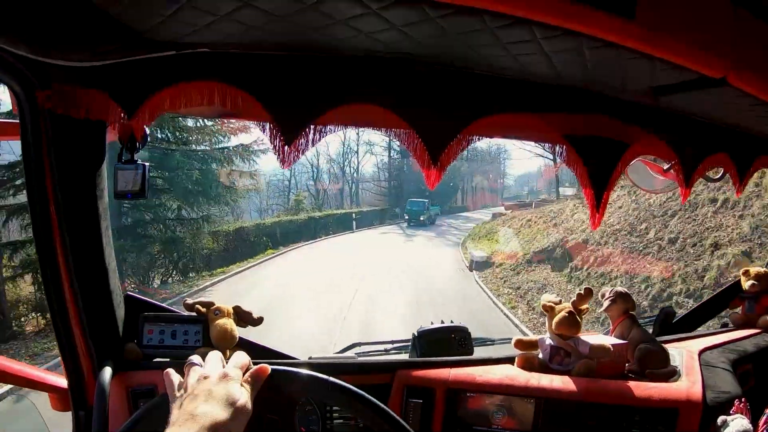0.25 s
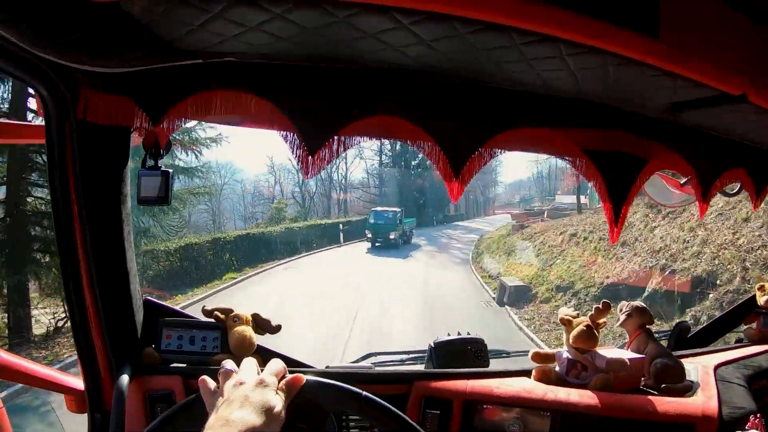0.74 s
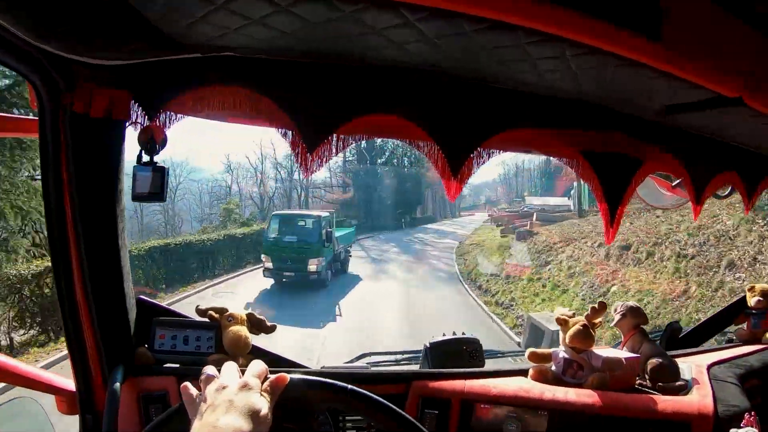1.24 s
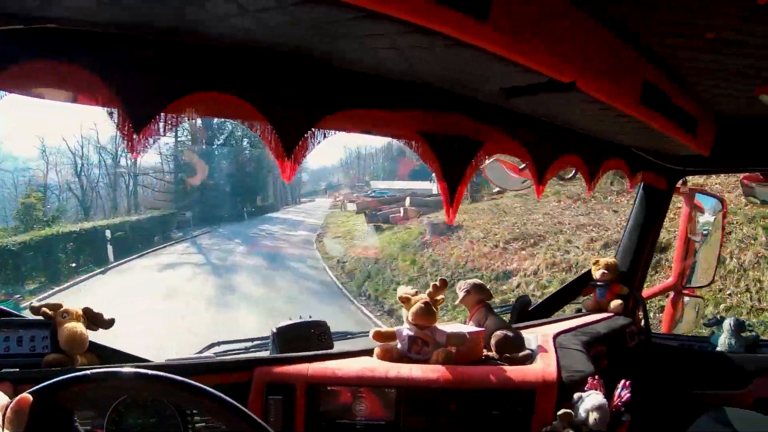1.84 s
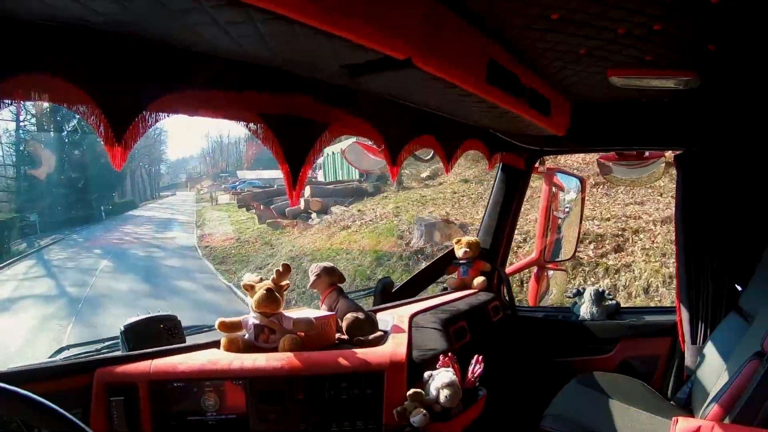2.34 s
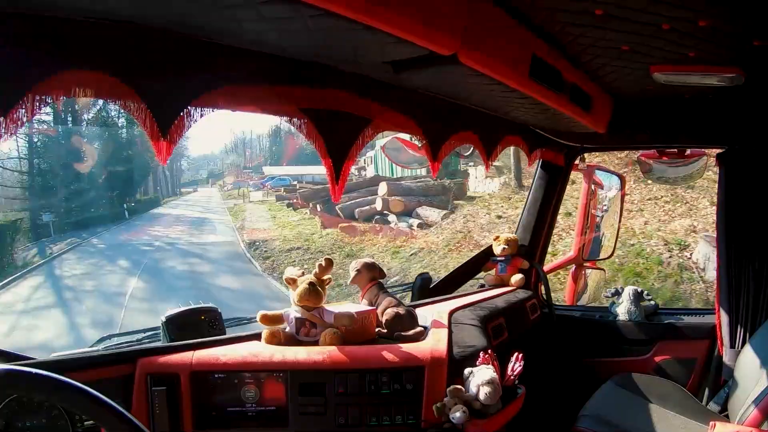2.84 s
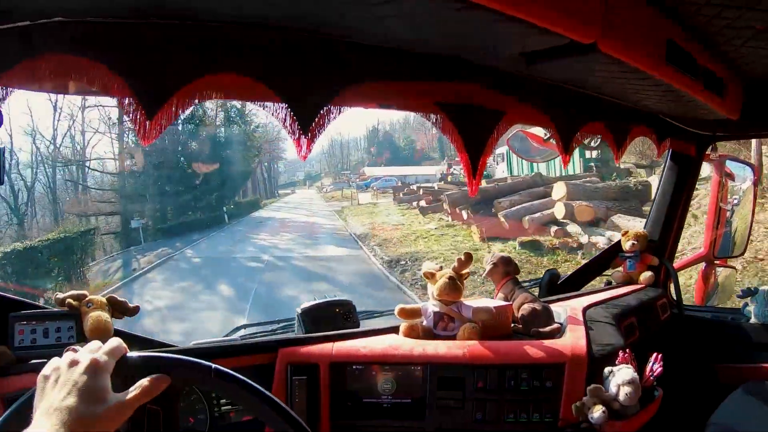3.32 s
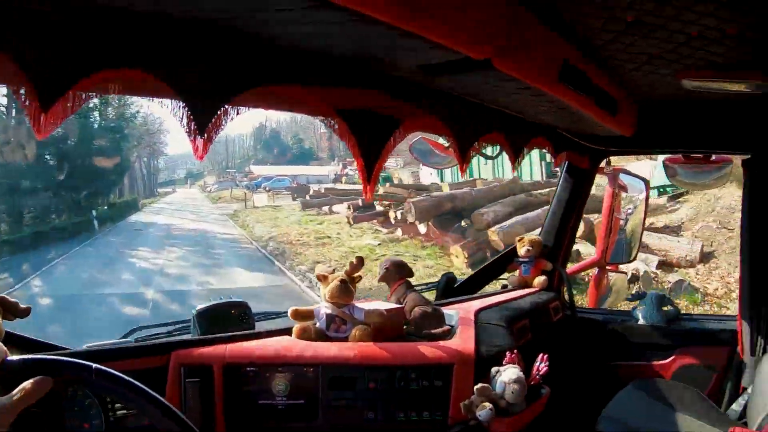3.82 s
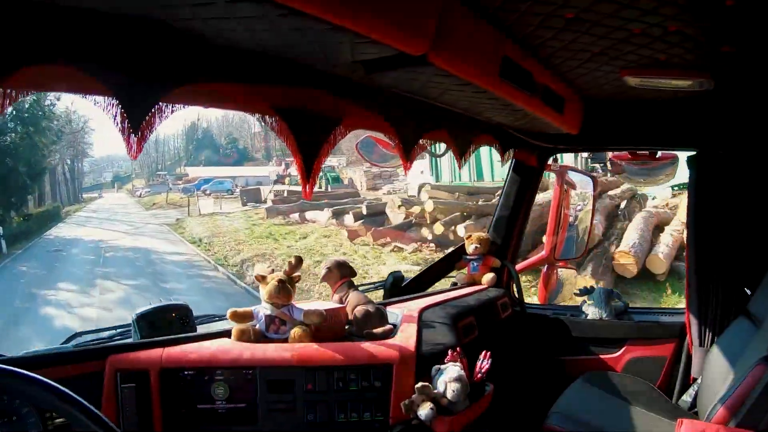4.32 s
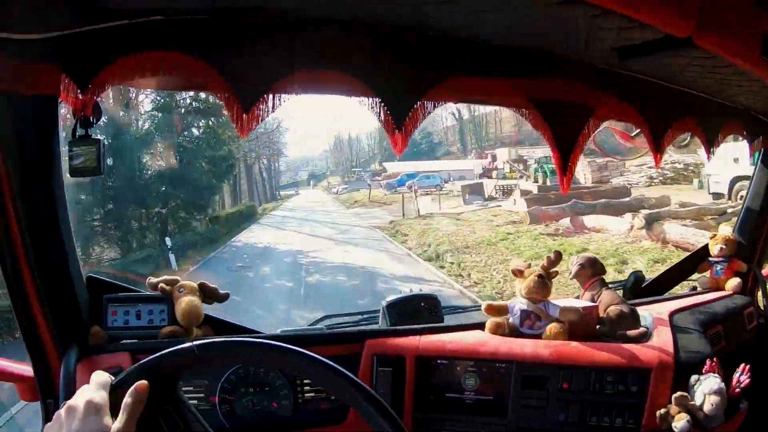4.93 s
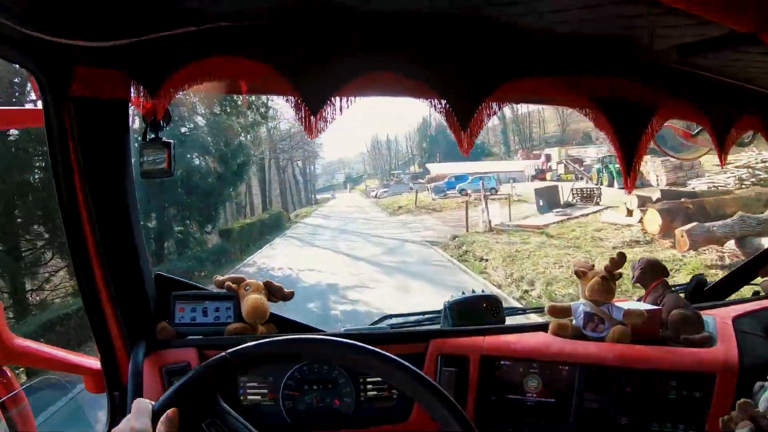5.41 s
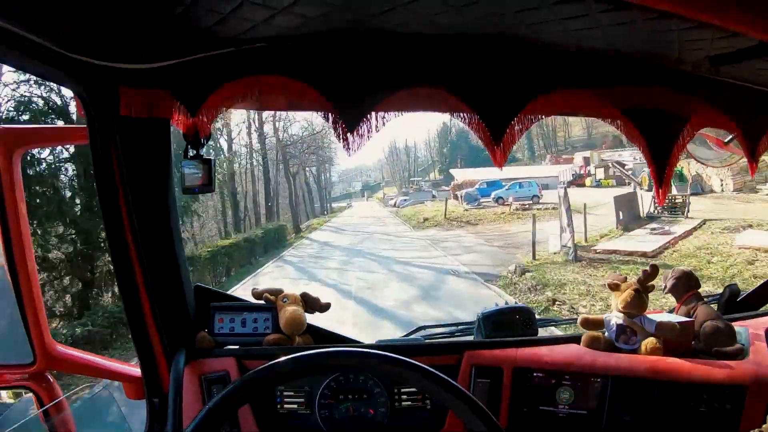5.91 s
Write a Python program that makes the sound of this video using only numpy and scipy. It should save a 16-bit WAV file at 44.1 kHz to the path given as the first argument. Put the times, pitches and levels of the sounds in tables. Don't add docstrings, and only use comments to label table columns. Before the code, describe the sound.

From the start a heavy diesel drones close and boomy inside a truck cab, its low pulsing tone sinking gradually until about 1.8 seconds. Block clatter, fine injector rattle, hiss and a faint fan hum surround it; dash panels buzz unevenly, and thin rubber squeaks come early and around 1.2 to 1.7 seconds. From about 1.6 an oncoming lorry swells quickly, whooshes by at 1.95 with a puff of air, and fades by 2.5, leaving a brief reflected rattle. The engine drops clearly softer around 2.4 to 2.7, then regains force by 3.3 and climbs steadily in pitch to the end at about 6.2. Tyre rumble and soft low bumps continue, strongest near 5.1, with tiny dry trim ticks from 3.2 onward. From 4.8 the knock hardens slightly and a very faint turbo whistle glides upward, levelling near 5.9. The microphone is small, stereo and slightly compressed.

```python
import sys
import numpy as np
from scipy import signal
from scipy.io import wavfile
from scipy.ndimage import uniform_filter1d

SR = 44100
rng = np.random.default_rng(int(sys.argv[2]) if len(sys.argv) > 2 else 0)


def makeup_ratio(level_db):
    decades = np.asarray(level_db, float) / 20
    return 10 ** decades


def waveform_to_disk(signal):
    frames = np.transpose(np.atleast_2d(signal))
    scaled = np.clip(frames, -1, 1) * 32767
    samples = np.round(scaled).astype(np.int16)
    wavfile.write(sys.argv[1], SR, samples)


N = 271656
T = np.arange(N) / SR

# time_s, half_firing_rate_hz, force_db
ENGINE_RUN = [(0.0, 30.63, 2), (0.2, 29.9, 0.5), (0.5, 29.11, 3), (0.75, 28.47, 4), (1.25, 26.68, 3.5),
              (1.75, 26.37, 3), (1.92, 26.9, 1), (2.4, 26.91, -11), (2.7, 27.34, -9.5), (3.25, 28.4, 0.5),
              (3.6, 28.66, 1.5), (4.0, 29.84, 2), (4.6, 31.9, 1), (4.9, 33.07, 1.5), (5.2, 34.36, 0.5),
              (5.5, 35.86, 2.5), (5.8, 37.21, 3), (6.16, 37.7, 0.5)]
# time_s, pull_share
PULL_SHARE = [
    (0, 0.13),
    (1.8, 0.048),
    (1.96, 0.91),
    (6.16, 0.92),
]
ENGINE_ORDERS = [2, 3, 5, 6, 7, 8, *range(9, 31), 32, 33, 34, 36, 38, 39, 40, 42, 43, 44, 45, 46]
# labour_slow_db, labour_fast_db, pull_slow_db, pull_fast_db
ORDER_LEVELS = [(-45, -35.5, -35, -34.5), (-45, -54, -35.5, -47), (-43, -56, -46.5, -39.5),
                (-31.5, -28.5, -38, -30), (-52.5, -33.5, -34.5, -47.5), (-37, -54, -44, -34.5),
                (-29, -39.5, -37.5, -34), (-63.5, -59, -37.5, -36.5), (-50.5, -50, -45.5, -38),
                (-42.5, -30, -30, -33.5), (-46, -27, -44.5, -43.5), (-58, -42, -44.5, -40.5),
                (-24.5, -27, -35, -47), (-42, -46.5, -53, -43), (-38.5, -39, -46, -52),
                (-38, -52, -48, -51), (-49, -39.5, -56.5, -56.5), (-47, -55, -52, -45.5),
                (-35.5, -36, -40, -47.5), (-65.5, -48.5, -51.5, -59.5), (-45, -55.5, -56, -62.5),
                (-45, -57, -61, -42), (-52, -56.5, -60, -48), (-56, -43.5, -53.5, -45),
                (-49, -34.5, -42.5, -54.5), (-55.5, -42.5, -43, -48), (-64, -58, -55.5, -56),
                (-46.5, -68, -48.5, -56.5), (-58.5, -71.5, -52.5, -57.5), (-64, -61, -62, -68),
                (-64, -47, -58, -52.5), (-58, -47, -66.5, -63.5), (-56, -45, -61.5, -56.5),
                (-60.5, -51.5, -54, -61.5), (-50.5, -47.5, -63, -63), (-54, -61, -64, -55),
                (-55.5, -55.5, -67, -59.5), (-54, -63.5, -67, -62), (-60, -61, -62, -59),
                (-61.5, -62.5, -68, -62)]
# pitch_hz, gain_db
CAB_RESPONSE = [(45, 2), (78, 0), (92, -8.5), (111, -0.5), (120, -2.5), (132, -0.5), (142, 3.5), (157, 8),
                (168, 5), (184, -6.5), (212, 1), (235, -1.5), (257, 6), (274, -5.5), (297, 4), (325, 1),
                (375, 4.5), (430, -4), (480, 5)]
# pitch_hz, width_hz, boost_db
SUMP_RINGING = [(468, 53, 6), (574, 42, 4.5), (651, 39, 11), (827, 76, 6), (930, 59, 4.5)]
# pitch_hz, level_db
CLATTER_COLOUR = [(180, -28), (300, -1.5), (391, -12), (646, -4.5), (901, -9.5), (973, -6.5), (1110, -6),
                  (1280, -8.5), (1970, -13.5), (2300, -18.5), (2990, -31), (5060, -120)]
# pitch_hz, width_hz, boost_db
BLOCK_RINGING = [(593, 120, 2.5), (862, 99, 4), (955, 31, 3.5), (1264, 145, 4.5), (1600, 130, 4),
                 (1768, 90, 1), (1987, 57, 3)]
# middle_s,
# half_length_s, level_db, pitch_hz
PANEL_BUZZES = [(0.053, 0.059, -38, 940), (0.32, 0.33, -40.5, 962), (1.23, 0.66, -45, 955),
                (0.563, 0.034, -36, 965), (.555, 0.025, -46, 1300), (0.655, 0.032, -38, 955),
                (1.05, 0.16, -42.5, 970), (1.4, 0.0099, -36, 965), (1.1, 0.012, -45, 960),
                (1.7, .015, -37, 860), (1.77, 0.039, -40, 955), (1.8, .05, -41, 1310),
                (1.925, 0.041, -36.5, 1570), (2.09, 0.02, -33.5, 1000), (3.44, 0.24, -46, 575),
                (4, 0.074, -42, 880), (5.75, 0.21, -38, 840), (2.65, .2, -49.5, 1630),
                (4.28, .25, -46, 1640), (5.6, 0.22, -48.5, 2200), (3.203, 0.23, -44, 1285),
                (0.48, .2, -46.5, 1400), (3.73, 0.35, -39.5, 959.2), (4.88, 0.21, -46.5, 1800),
                (5.147, 0.23, -39, 955), (5.57, 0.31, -37, 960), (5.63, 0.27, -43.5, 1950),
                (2.24, .12, -42, 1310), (1.96, .03, -38, 1930), (1.85, .05, -40, 1490),
                (1.94, .09, -41, 700), (1.42, 0.13, -44.5, 1110), (5.9, 0.23, -44.5, 1900),
                (4.85, .15, -43.5, 650), (2.25, .06, -41.5, 1010)]
# pitch_hz, level_db
WHOOSH_COLOUR = [(150, -37), (290, -1.5), (450, -21), (692, -7), (1150, -8.5), (1550, -3.5), (1930, -8.5),
                 (3170, -14), (4780, -21), (7930, -16), (10200, -27.5), (11000, -42.5), (13000, -43),
                 (15000, -51.5), (17000, -98)]
# pitch_hz, level_db
RATTLE_COLOUR = [(1500, -25), (2100, -3), (2450, -3), (2850, 0), (3200, -3), (3500, -8), (3900, -9),
                 (4300, -10), (4600, -14.5), (5000, -16), (6000, -30), (10200, -33), (11200, -60)]
# pitch_hz, level_db
HISS_COLOUR = [(3000, -25), (4500, -3), (5600, 0), (7000, -2), (8800, -3), (10200, -11), (10900, -21),
               (13000, -27), (14500, -36), (15300, -55), (17000, -80)]
# time_s, level_db
FAN_LEVEL = [
    (0, -28.5),
    (1, -46),
    (3, -29.5),
    (3.6, -28.5),
    (4.2, -64),
]
# time_s, level_db
PUMP_LEVEL = [(0, -47.5), (.5, -49), (.9, -56), (1.35, -43.5), (1.7, -52.5), (2.2, -47), (2.7, -46.5),
              (3.2, -47), (3.8, -56), (4.3, -44), (5, -57), (6.16, -51)]
# middle_s, half_length_s, level_db, pitch_hz
MOUNT_SQUEAKS = [
    (0.095, 0.096, -62.5, 4670),
    (.35, .2, -67.5, 4570),
    (.47, 0.038, -73, 4670),
    (1.24, 0.048, -59.5, 4060),
    (1.322, 0.046, -57.5, 4065),
    (1.463, .08, -60, 3970),
    (1.7, .05, -61, 3860),
]
# pitch_hz, level_db
THUMP_COLOUR = [(6, -3), (14, 0), (24, 14.5), (31, -2), (39, 7.5), (48, 4.5), (70, -49), (200, -120)]
# pitch_hz, level_db
ROAD_COLOUR = [(24, -33), (40, -9.5), (92, 3), (145, 1.5), (165, -0.5), (208, -8.5), (280, -12.5),
               (415, -24), (450, -36.5), (580, -55), (990, -120)]
# middle_s, level_db
ROAD_BUMPS = [(.06, -23.5), (0.4, -28.5), (1.0, -46), (1.95, -37), (2.37, -27), (3.1, -28.5), (3.501, -35),
              (4.2, -39), (4.6, -26), (4.87, -26), (5.13, -19), (5.8, -22)]
# start_s, level_db, pitch_hz, length_s
TRIM_TICKS = [(3.191, -46, 7000, 0.007), (3.643, -36.5, 4100, 0.014), (3.64, -43, 6200, 0.012),
              (4.322, -36, 8524, 0.003), (4.431, -37, 6070, 0.01), (5.35, -41, 6500, .008),
              (5.428, -39, 6976, 0.006), (5.818, -36, 6995, 0.0026), (3.258, -42, 5000, .005),
              (4.287, -46, 6004, 0.0051), (5.284, -44, 6010, .005), (6.133, -43, 5890, 0.0096)]
# pitch_hz, likeness
PORT_LIKENESS = [(60, 1), (150, .99), (260, .97), (540, .84), (1100, .62), (2300, .68), (4800, .5),
                 (10000, .4), (12000, .45)]
# pitch_hz, lead_rad
PORT_LEAD = [(350, 0), (690, -.3), (950, 1.0), (1550, .9), (2240, -.6), (2670, -1.1), (3700, .25),
             (4480, -.4), (5400, -1.8), (8270, -2.8), (10300, -2.6), (12000, -1.6)]
# pitch_hz, left_minus_right_db
PORT_LEAN = [(330, -.5), (590, -4), (1040, -7), (1830, -5), (3240, -3), (5730, -1), (10100, -2),
             (12000, -.5)]

SLOWEST_HZ = 27
LABOUR_SPAN_HZ, PULL_SPAN_HZ = 4, 11
# labouring_db, pulling_db, extra_db per Hz of speed when pulling, extra_db per dB of force
CLATTER_LAW, RATTLE_LAW = (-40, -37, 0.356, 0.17), (-49.5, -47.5, 0.5556, 0.02)
HISS_LAW = (-58, -59, 1.0345, 0.03)
JOLT_LAW, RUMBLE_LAW = (-42, -29.5, 0.43, 0.3), (-35, -34.5, 0.33, 0.2)
PULSE_TURNS = 1 / 3
KNOCK_DB, KNOCK_PULL_DB, KNOCK_ODD_DB = -65, 4.5, -5.5
BUMP_S = 0.052
PASS_S, PASS_DB, NEARING_DB_PER_S, LEAVING_DB_PER_S = 1.949, -43, 37, 36
GUST_DB, GUST_S = -50.5, 0.046
TYRES_AHEAD_S, TYRES_DB = 0.16, -57
ECHO_AFTER_S, ECHO_DB, ECHO_S = 0.23, -53.5, 0.33
SPOOL_S, SPOOL_HZ, SPOOL_HZ_PER_S = 4.8, 5400, 2390
BOOST_HZ = 8000
TURBO_DB, TURBO_DB_PER_S, TURBO_RISE_S = -69.5, 3, .12
BOOST_DB, BOOST_S = 1, 0.13


def evened(x):
    return x / np.sqrt(np.mean(x ** 2) + 1e-20)


def read(points, hz):
    f, value = np.transpose(points)
    return np.interp(np.log(hz + 1), np.log(f + 1), value)


def curve(rows, column, t=T):
    rows = np.array(rows)
    return np.interp(t, rows[:, 0], rows[:, column])


def humps(modes, hz):
    return sum(db / (1 + (2 * (hz - f) / width) ** 2) for f, width, db in modes)


def drift(rate_hz, t=T):
    rates = np.geomspace(rate_hz / 12, rate_hz, num=8)
    return evened(sum(np.sin(2 * np.pi * (f * t + rng.random())) / np.sqrt(f) for f in rates))


def swell(at_s, db, width_s):
    return makeup_ratio(db) * np.exp(-((T - at_s) / width_s) ** 2)


def follow(labour_db, pull_db, per_hz, per_force):
    faster = curve(ENGINE_RUN, 1) - SLOWEST_HZ
    pulling_db = curve(PULL_SHARE, 1) * (pull_db - labour_db + per_hz * faster)
    return makeup_ratio(labour_db + pulling_db + per_force * curve(ENGINE_RUN, 2))


def noise(shape_db, size, patchy_db, repeating=0):
    overlap = 3 * size // 4
    source = rng.standard_normal((2, N)) + repeating
    hz, t, (left, other) = signal.stft(source, SR, nperseg=size, noverlap=overlap)
    patches = rng.standard_normal((len(t), len(hz))).T
    patches = uniform_filter1d(patches, size=8, axis=0)
    patches = evened(uniform_filter1d(patches, size=10, axis=1))
    same = np.clip(read(PORT_LIKENESS, hz), -1, 1)[:, None]
    shifted = left * np.exp(-1j * read(PORT_LEAD, hz))[:, None]
    right = same * shifted + np.sqrt(1 - same ** 2) * other
    lean = makeup_ratio(read(PORT_LEAN, hz) / 2)[:, None]
    z = np.array([left * lean, right / lean]) * makeup_ratio(shape_db(hz)[:, None] + patchy_db * patches)
    return evened(signal.istft(z, nperseg=size, noverlap=overlap)[1][:, :N])


def whistle(turns, level_db, fuzz_db, waver):
    t = T[::32]
    fuzz = np.interp(T, t, drift(60, t))
    slip = np.interp(T, t, drift(150, t))
    return makeup_ratio(level_db + fuzz_db * fuzz) * np.sqrt(2) * np.sin(2 * np.pi * turns + waver * slip)


def crank():
    return np.cumsum(curve(ENGINE_RUN, 1) / 3 * (1 + .002 * drift(6))) / SR


def engine(cycles, wander_db=1.2, scatter=.15):
    t = T[::512]
    half_hz, pull = curve(ENGINE_RUN, 1, t), curve(PULL_SHARE, 1, t)
    out = np.zeros(N)
    spans = np.array([[LABOUR_SPAN_HZ], [PULL_SPAN_HZ]])
    labour_fast, pull_fast = np.clip((half_hz - 26.5) / spans, 0, 1)
    for k, dbs in zip(ENGINE_ORDERS, ORDER_LEVELS):
        labour_db = dbs[0] + labour_fast * (dbs[1] - dbs[0])
        pull_db = dbs[2] + pull_fast * (dbs[3] - dbs[2])
        db = labour_db + pull * (pull_db - labour_db) + read(CAB_RESPONSE, k * half_hz / 3)
        size = makeup_ratio(db + curve(ENGINE_RUN, 2, t) + wander_db * drift(4.4, t))
        stray = rng.random()
        start = 2 * np.pi * (stray if k % 3 else PULSE_TURNS)
        slip = start + scatter * drift(2.9, t)
        out += np.interp(T, t, size) * np.cos(2 * np.pi * k * cycles + np.interp(T, t, slip))
    late = np.pad(out, (4, 0), "edge")[:N]
    return np.sqrt(2) * np.array([late, out]) * makeup_ratio([[-.25], [.25]])


def sump_knock(cycles):
    t, out = T[::256], np.zeros(N)
    for k in range(48, 100, 3):
        db = KNOCK_DB + KNOCK_PULL_DB * curve(PULL_SHARE, 1, t) + KNOCK_ODD_DB * (k % 2)
        db = db + humps(SUMP_RINGING, k * curve(ENGINE_RUN, 1, t) / 3)
        db = db + 1.2 * curve(ENGINE_RUN, 2, t) + 2.25 * drift(8.7, t)
        slip = 2 * np.pi * rng.random() + 0.58 * drift(9, t)
        out += np.interp(T, t, makeup_ratio(db)) * np.cos(2 * np.pi * k * cycles + np.interp(T, t, slip))
    return np.sqrt(2) * out * [[.72], [1.28]]


def clatter(cycles, knock=0.029, regular=0.79):
    angle = np.arange(4097) / 4096
    rows = rng.standard_normal((2, 4097))
    pattern = np.array([np.interp(cycles % 1, angle, row) for row in rows])
    ring = noise(lambda hz: read(CLATTER_COLOUR, hz) + humps(BLOCK_RINGING, hz), size=4096,
                 patchy_db=1.56, repeating=regular * pattern)
    firing = np.cos(2 * np.pi * 6 * cycles)
    boost = makeup_ratio(BOOST_DB * np.clip((T - SPOOL_S) / BOOST_S, 0, 1))
    return ring * (1 + knock * firing) * follow(*CLATTER_LAW) * boost * makeup_ratio(4.0)


def panels():
    hum = sum(swell(s, db, half_s) * whistle(hz * T, 0, fuzz_db=1.0, waver=0.76)
              for s, half_s, db, hz in PANEL_BUZZES)
    return hum * [[.65], [1.35]]


def lorry():
    fade = np.interp(T, [1.15, 1.6, 2.3, 2.7], [0, 1, 1, 0])
    away_db = np.maximum(NEARING_DB_PER_S * (PASS_S - T), LEAVING_DB_PER_S * (T - PASS_S))
    size = makeup_ratio(PASS_DB - away_db) + swell(PASS_S - .02, GUST_DB, GUST_S)
    whoosh = noise(lambda hz: read(WHOOSH_COLOUR, hz), size=512, patchy_db=2.0)
    return whoosh * fade * size * makeup_ratio(13.5)


def injectors(cycles):
    firing = np.cos(2 * np.pi * 6 * cycles)
    rattle = noise(lambda hz: read(RATTLE_COLOUR, hz), size=1024, patchy_db=1.5)
    size = follow(*RATTLE_LAW) + swell(PASS_S + ECHO_AFTER_S, ECHO_DB, ECHO_S)
    return rattle * (1 + 0.035 * firing) * size


def air_hiss():
    size = follow(*HISS_LAW) + swell(PASS_S - TYRES_AHEAD_S, TYRES_DB, 0.44)
    return noise(lambda hz: read(HISS_COLOUR, hz), size=512, patchy_db=1.5) * size


def turbo():
    spool_hz = np.clip(SPOOL_HZ + SPOOL_HZ_PER_S * (T - SPOOL_S), SPOOL_HZ, BOOST_HZ)
    spool_hz = uniform_filter1d(spool_hz, size=6000)
    spool_db = TURBO_DB + TURBO_DB_PER_S * (T - SPOOL_S)
    rise = np.clip((T - SPOOL_S) / TURBO_RISE_S, 0, 1)
    return rise * whistle(np.cumsum(spool_hz) / SR, spool_db, fuzz_db=4.5, waver=1.3) * [[1.3], [.7]]


def fan_and_pump(cycles):
    fan = makeup_ratio(curve(FAN_LEVEL, 1)) * np.sqrt(2) * np.sin(2 * np.pi * 5.25 * cycles)
    pump = whistle(126 * cycles, curve(PUMP_LEVEL, 1), fuzz_db=1.5, waver=.6)
    return pump * [[.7], [1.3]] + fan


def mounts():
    squeak = sum(swell(s, db, half_s) * whistle(hz * T, 0, fuzz_db=1.5, waver=.45)
                 for s, half_s, db, hz in MOUNT_SQUEAKS)
    return squeak * [[1.6], [.6]]


def road():
    jolts = follow(*JOLT_LAW) + sum(swell(s, db, BUMP_S) for s, db in ROAD_BUMPS)
    thump = noise(lambda hz: read(THUMP_COLOUR, hz), size=4096, patchy_db=0.5) * jolts
    rumble = noise(lambda hz: read(ROAD_COLOUR, hz), size=4096, patchy_db=0.0) * follow(*RUMBLE_LAW)
    return thump + rumble


def ticks():
    out, t = np.zeros((2, N + 2000)), np.arange(2000) / SR
    for s, db, hz, length in TRIM_TICKS:
        band = signal.butter(4, [.55 * hz, min(1.45 * hz, 10500)], "bandpass", fs=SR)
        puff = signal.lfilter(*band, rng.standard_normal((2, 2000)))
        shape = np.minimum(t / 0.0039, 1) * np.exp(-(t / length) ** 2)
        first = round(s * SR)
        out[:, first:first + 2000] += makeup_ratio(db) * puff * shape
    return out[:, :N]


def scene():
    cycles = crank()
    motor = engine(cycles) + sump_knock(cycles) + clatter(cycles) + panels()
    air = lorry() + injectors(cycles) + air_hiss()
    whines = turbo() + fan_and_pump(cycles) + mounts()
    return motor + air + whines + road() + ticks()


def top_cut(x):
    return signal.sosfilt(signal.butter(12, 15600, fs=SR, output="sos"), x)


def record(dry, ceiling=0.46):
    fade_in = np.sin(np.pi / 2 * np.clip(T / .0006, 0, 1)) ** 2
    fade_out = np.clip((T[-1] - T) / .008, 0, 1)
    return top_cut(ceiling * np.tanh(dry / ceiling) * fade_in * fade_out)


dry = scene()
out = record(dry)
waveform_to_disk(out)
```